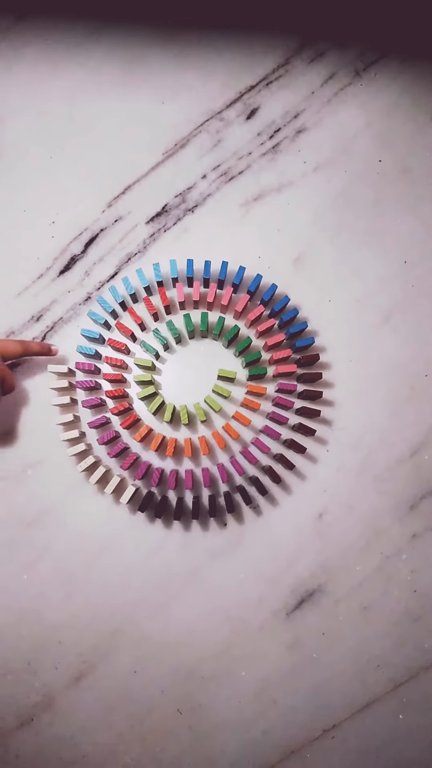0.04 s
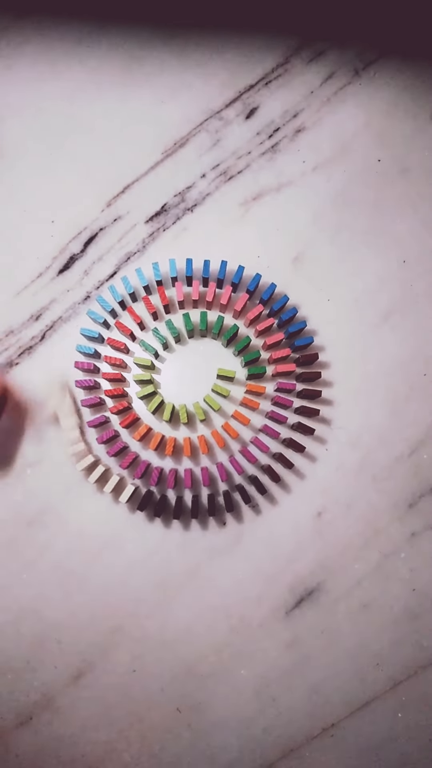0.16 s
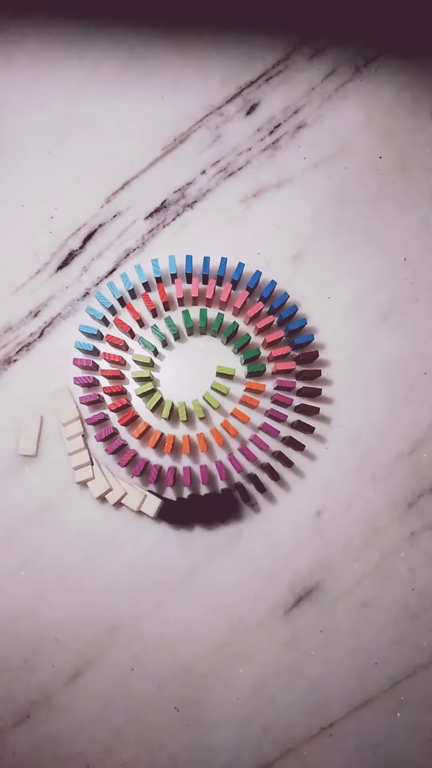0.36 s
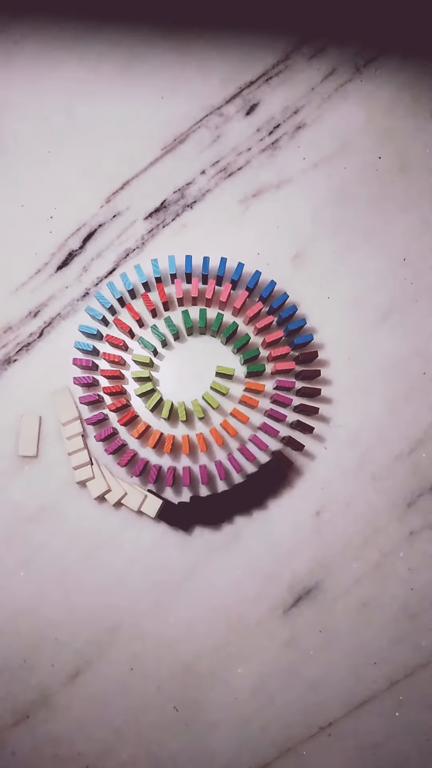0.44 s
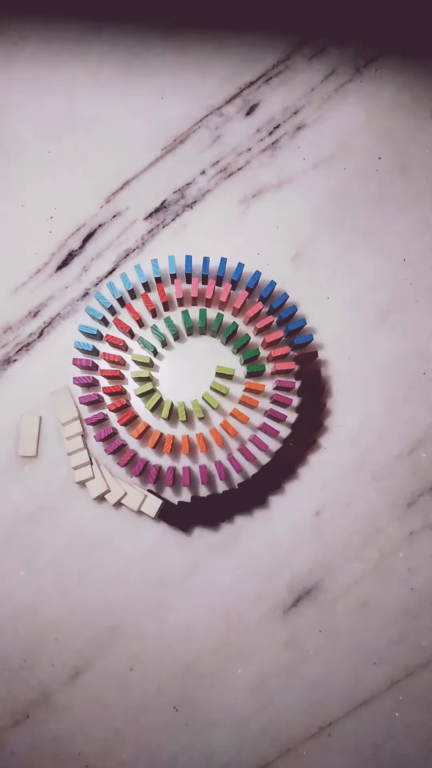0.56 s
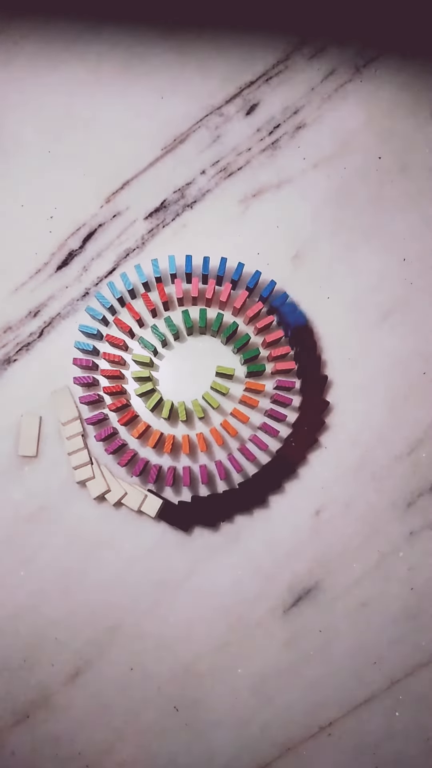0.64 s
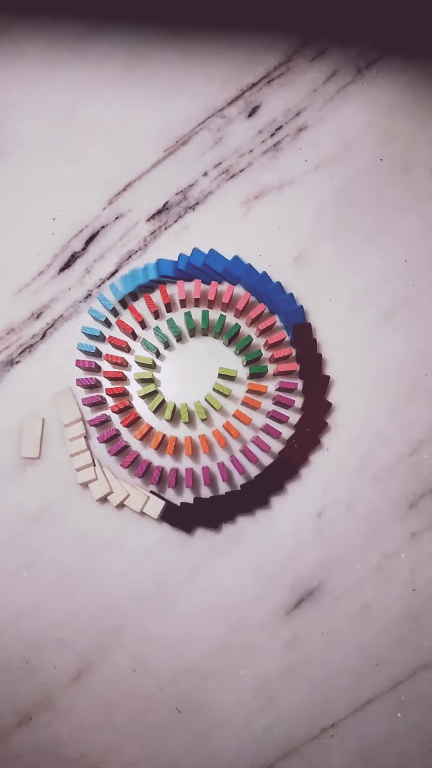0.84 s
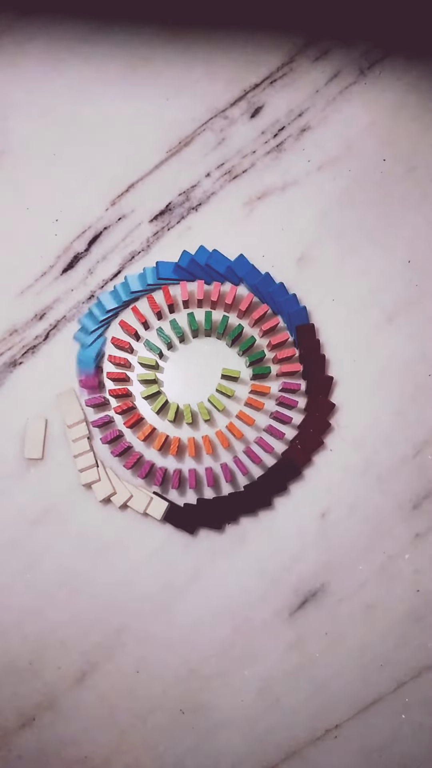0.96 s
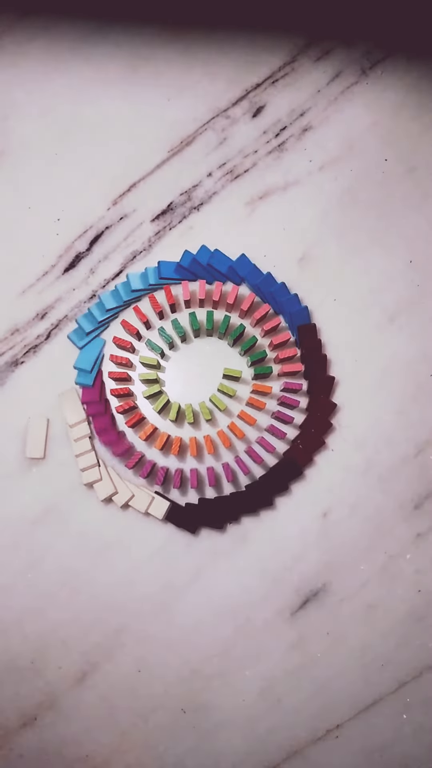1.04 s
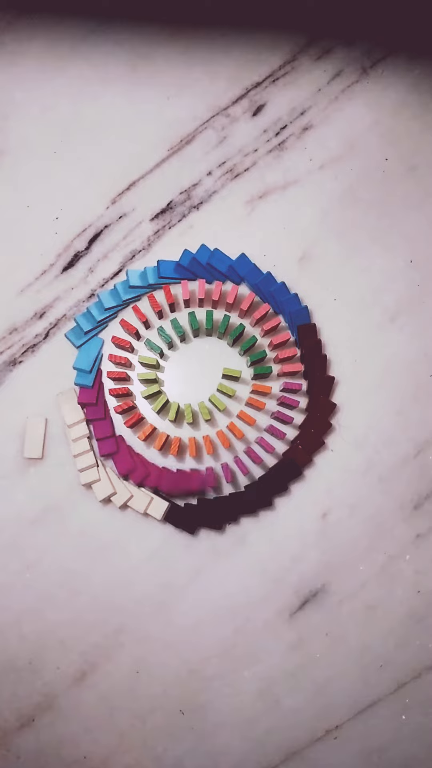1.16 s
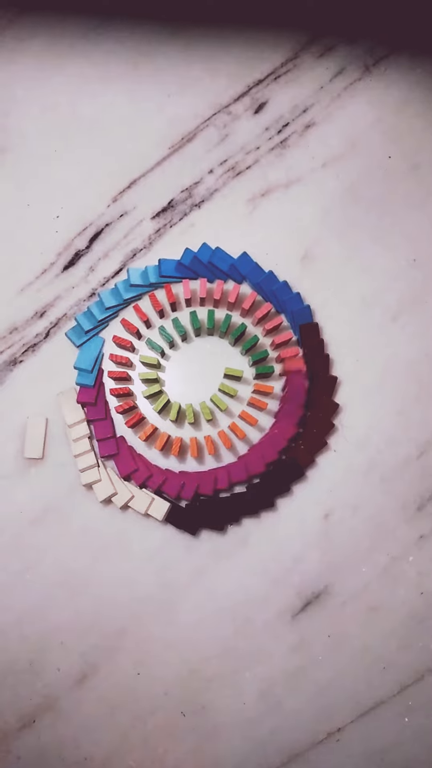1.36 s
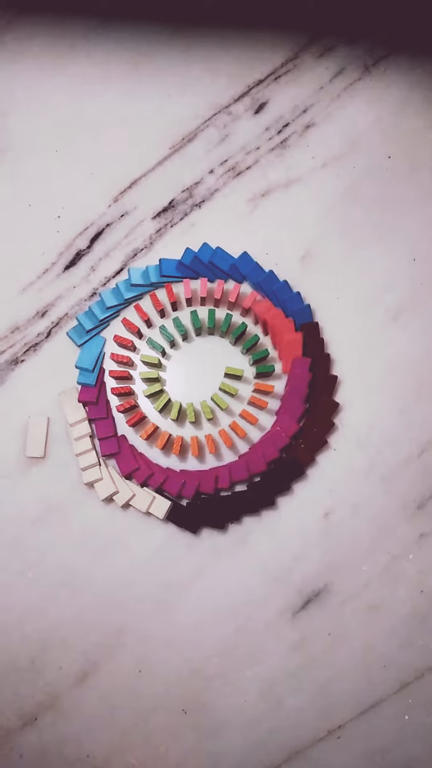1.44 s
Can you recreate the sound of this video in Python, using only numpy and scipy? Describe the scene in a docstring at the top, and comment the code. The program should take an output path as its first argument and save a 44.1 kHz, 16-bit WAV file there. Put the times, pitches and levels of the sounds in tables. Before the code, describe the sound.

Small wooden dominoes topple one after another on a marble floor, making a fast, bright clatter of sharp clicks that starts strong and then turns lighter. The microphone is close above, in a quiet, hard room.

```python
"""Dominoes toppling on marble

A spiral of small wooden dominoes falls on a marble floor, heard from a phone above it in a quiet, hard
room. Each knock is a bright crack with quick rebounds that rings the short modes of the block; lighter
contacts patter densely between the knocks. Soft thumps, low rumble, hiss and a faint whine lie behind."""
import sys
import numpy as np
from scipy import signal
from scipy.fft import rfft, irfft
from scipy.io import wavfile
from scipy.ndimage import uniform_filter1d

SR = 44100
rng = np.random.default_rng(int(sys.argv[2]) if len(sys.argv) > 2 else 0)


def digitize_waveform(pressure):
    """Quantize a signal to 16-bit integers and store it at the path in sys.argv[1].

    Rows of a 2-D input are taken as channels; values are limited to [-1, 1].
    """
    field = np.atleast_2d(pressure).T
    bounded = np.clip(field, -1, 1)
    quanta = np.round(bounded * 32767).astype(np.int16)
    wavfile.write(sys.argv[1], SR, quanta)


N = 66150  # 1.5 s


def knocks(hits=4, gap_s=0.0013):
    """Block strikes block: one hit, then quick rebounds, each slightly off pitch."""
    # knocks (time [s], level [dB], body ring [Hz], upper ring [dB re level], crack [dB re level])
    strikes = [(0.16, -41, 7600, -21, 4), (0.1689, -12, 8350, -26, 2), (0.1796, -20.5, 8800, -24, 12.5),
               (0.1898, -10, 8040, -19, 0.5), (0.1974, -30, 8850, -3, 2), (0.2148, -15, 8360, -3.5, 8.5),
               (0.2254, -36, 8100, -19, 14.5), (0.2291, -15.5, 8200, 3.5, 6.5), (0.236, -19.5, 8500, -3, 6),
               (0.2509, -22, 8400, 6, 11.5), (0.2755, -18, 8750, 1, 10), (0.2825, -12.5, 7800, -21, 9),
               (0.2947, 1.5, 8704, -16.5, -4.5), (0.3028, -22, 8140, -9, 13), (0.3116, -18, 9100, -6, 4.5),
               (0.3132, -23.5, 8160, 4, 6), (0.322, -13.5, 7930, -23, 11), (0.3322, -19, 9900, -22, -2),
               (0.3597, -14.5, 8040, -20, 8), (0.3725, -16.5, 6700, -3, -0.5), (0.393, -7, 7220, -5, 8.5),
               (0.4278, -10.5, 7500, -6, 7), (0.445, -18.5, 9400, 7, 0), (0.453, -2.5, 8110, -23, -10),
               (0.4647, -14.5, 9300, -13, -5), (0.4762, -10.5, 8140, -24, -14), (0.491, -6, 8190, -22, -28),
               (0.5137, -30.5, 8250, -6, 16), (0.5324, -43, 8200, -6, -12), (0.557, -30, 8700, -10, 0),
               (0.576, -26.5, 8860, 5, 13), (0.644, -28.5, 8760, -3, 11), (0.6716, -25.5, 8370, -6, 5.5),
               (0.7119, -14.5, 8720, -34, 2), (0.7337, -26, 8100, -21, 5), (0.773, -17.5, 8330, -17, -11),
               (0.7879, -22, 8760, -23, 3.5), (0.8433, -15.5, 7700, -12, -1),
               (0.8632, -20, 7600, -1.5, 5.5), (0.882, -12, 9030, -11, 0), (0.898, -27, 8700, -16, 5),
               (0.9052, -20, 9230, -6, -4), (0.934, -35, 8200, -10, 7.5), (0.976, -28, 6800, -12, 5),
               (0.9999, -27.5, 8660, -7, 9.5), (1.0229, -35, 9700, -9, 18), (1.0777, -29.5, 8230, 7, 14.5),
               (1.0992, -28, 9100, 4, 6), (1.122, -33, 6950, 8, 11), (1.1338, -25, 8640, -6, 4),
               (1.153, -31, 6800, 0.5, 12), (1.1985, -24.5, 8590, -20, -1.5),
               (1.2129, -20.5, 8190, -12, -0.5), (1.2219, -24, 8730, -10, 4.5),
               (1.23, -13.5, 8870, -30, -4.5), (1.2357, -21.5, 9370, -9, 4.5), (1.258, -23, 9030, -8, 8.5),
               (1.3249, -32, 8930, -16, -7), (1.346, -27, 8460, -29, 2), (1.3575, -33, 7540, -22, 12),
               (1.384, -31, 9590, -30, 8), (1.399, -40, 8200, -18, 14.5), (1.4336, -21.5, 8570, -25, 0.5),
               (1.4426, -17, 8560, -11, 1), (1.464, -24.5, 8260, -7, 8), (1.4781, -26.5, 8270, -7, 6),
               (1.495, -29, 8450, -12, -3)]
    at, db, body_hz, upper_db, crack_db = np.repeat(np.array(strikes, float), hits, axis=0).T
    timing, loss, detune = rng.random((len(at), 3)).T
    bounce = np.arange(len(at)) % hits
    rebound = bounce > 0
    at = at + gap_s * bounce * (0.9 + 0.25 * timing)
    rebound_db = np.minimum(-10.5 - 0.2358 * db, 3) - 4 * loss  # light knocks rebound more, and blur
    db = db + rebound * rebound_db
    body_hz = body_hz * (1 + 0.074 * rebound * (detune - 0.5))
    crack_db = crack_db + 2 * (bounce == 1)  # the first rebound cracks harder than the later ones
    return contacts(at, db, body_hz, upper_db, crack_db, bass_cut=0.85)


def patter(start_s=0.157, per_second=1600):
    """Dense light contacts between the knocks, pitched by the run of blocks that is falling."""
    # course of the patter (time [s], level [dB], crack [dB re level])
    course = [(0.158, -53, 19.5), (0.2, -35, 9), (0.33, -41, 9.5), (0.49, -40, 8.5), (0.6, -43, 7.5),
              (0.74, -40, 1), (0.88, -34.5, -1), (0.97, -45.5, 7), (1.12, -40.5, 9), (1.19, -53, 9),
              (1.26, -48.5, 6.5), (1.426, -54, 4.5), (1.446, -47, 4.5), (1.5, -40, 4.5)]
    times, levels, cracks = np.array(course, float).T
    span_s = N / SR - start_s
    at = start_s + span_s * rng.random(int(per_second * span_s))
    detune, crack_scatter, upper_scatter, level_scatter = rng.standard_normal((len(at), 4)).T
    _, body_hz, _, upper_db, _, _ = falling_run(at)
    db = np.interp(at, times, levels) + 4.5 * np.clip(level_scatter, -2, 2)
    crack_db = np.interp(at, times, cracks) + 4 * crack_scatter
    body_hz = body_hz * (1 + 0.0765 * detune)
    return contacts(at, db, body_hz, upper_db + 4 * upper_scatter, crack_db, bass_cut=0.0047)


def falling_run(at):
    """The ring settings of the run of alike blocks falling at each moment, column by column."""
    # runs (start [s], body ring [Hz], upper ring [Hz], upper ring in the patter [dB re body],
    #       top ring [Hz], top ring [dB re crack])
    runs = [(0.15, 8540, 13100, -16.5, 14700, -23), (0.225, 8530, 11360, -23, 15100, -25.5),
            (0.431, 8500, 10820, -16, 15600, -25), (0.55, 8500, 11350, -6, 15700, -26),
            (0.63, 8570, 11120, -14, 15400, -22), (0.721, 8170, 9770, -22, 15000, -20),
            (0.85, 8230, 12400, -12, 15400, -20), (0.99, 8430, 10130, -2, 14350, -19),
            (1.102, 8560, 10240, -13, 13050, -17), (1.19, 8880, 13200, -12, 15500, -24),
            (1.31, 8780, 13100, -28, 15500, -24), (1.43, 8200, 12930, -14, 15100, -19)]
    runs = np.array(runs, float)
    return runs[np.clip(np.searchsorted(runs[:, 0], at) - 1, 0, None)].T


def contacts(at, db, body_hz, upper_db, crack_db, bass_cut):
    """Each contact cracks and rings the block: three high modes and a faint hollow note of the wood."""
    noise = rng.standard_normal((len(at), 258))  # per contact: two detunings, then the crack's grain
    _, _, upper_hz, _, top_hz, top_db = falling_run(at)
    crack_level = db + crack_db
    crack = cracks(at, crack_level, noise[:, 2:], bass_cut)
    body = rings(at, body_hz, db, t60_s=0.0088)
    upper = rings(at, upper_hz * (1 + 0.014 * noise[:, 0]), db + upper_db, t60_s=0.0095)
    top = rings(at, top_hz * (1 + 0.028 * noise[:, 1]), crack_level + top_db, t60_s=0.0095)
    hollow = rings(at, 1124.5 * np.exp(0.1536 * noise[:, 1]), crack_level - 47, t60_s=0.028)
    return crack + body + upper + top + hollow


def cracks(at, db, noise, bass_cut, t60_s=0.0044, attack_s=0.0012, full_snap_db=-8):
    """The impact itself, a brief burst of noise: hard ones open with a snap, light ones swell in."""
    # spectrum of a crack (frequency [Hz], level [dB])
    spectrum = [(290, -56), (500, -67.5), (1200, -33.5), (1730, -19), (2090, -20), (5190, -13), (8250, -7),
                (10100, -19.5), (13200, -27.5), (15800, -37)]
    t = np.arange(noise.shape[1]) / SR
    hardness = undb(np.minimum(db - full_snap_db, 0) / 2)
    swell = 1 - (1 - hardness[:, None]) * np.exp(-t / attack_s)
    grain = noise * decay(t, t60_s) * swell
    grain[:, 0] = 5.3 * hardness ** 2 * np.sign(grain[:, 0])  # the snap
    grain /= np.sqrt(np.sum(grain ** 2, axis=1, keepdims=True))
    bursts = place(at, undb(db)[:, None] * grain)
    return signal.lfilter([1, -bass_cut], [1], colour(bursts, spectrum))


def rings(at, hz, db, t60_s, attack_s=0.0012):
    """One mode of the block: a fading sine from each contact."""
    t = np.arange(1200) / SR
    envelope = 2 * decay(t, t60_s) * (1 - np.exp(-t / attack_s))
    return place(at, undb(db)[:, None] * envelope * np.sin(2 * np.pi * hz[:, None] * t))


def reverb(direct, t60_s=0.37, build_s=0.0011):
    """The hard room answers with a short, diffuse tail."""
    t = np.arange(SR // 3) / SR
    tail = rng.standard_normal(len(t)) * decay(t, t60_s) * (1 - np.exp(-t / build_s))
    return signal.fftconvolve(direct, tail / np.sqrt(np.sum(tail ** 2)))[:N]


def thumps(half_length_s=0.014):
    """Soft, dull thumps, deep or hollow: each a brief swell of a tone and its octave."""
    # thumps (centre time [s], level [dB], pitch [Hz])
    swells = [(0.04, -51.5, 80), (.112, -56, 92), (.35, -52.5, 65), (.44, -48, 72), (.545, -50.5, 75),
              (0.669, -53, 80), (0.724, -48.5, 95), (.875, -54.5, 62), (0.976, -51, 80), (0.216, -49, 920),
              (.32, -62.5, 308), (.39, -62, 480), (.44, -64, 300), (.872, -64, 311.5)]
    t = np.arange(N) / SR
    out = np.zeros(N)
    for at, db, hz in swells:
        phase = 2 * np.pi * rng.random(2)
        tone = np.sin(2 * np.pi * hz * t + phase[0]) + 0.39 * np.sin(4 * np.pi * hz * t + phase[1])
        out += undb(db) * np.exp(-((t - at) / half_length_s) ** 2) * tone
    return out


def room_tone(whine_fade_db_per_s=8.5):
    """The quiet room: soft hiss, low rumble and a whine of narrow tones that waver and fade."""
    # spectrum of the hiss (frequency [Hz], level [dB])
    spectrum = [(76, -47), (130, -7), (309, -7.5), (481, -10), (2050, -20.5), (2220, -14.5), (3200, -7.5),
                (4680, -30), (9100, -26.5), (16000, -51)]
    # tones of the whine (frequency [Hz], width [Hz], level before wavering and fading [dB])
    whine = [(2260, 49, -74.5), (2846, 26, -66), (3144, 62, -63.5), (309.3, 22, -72)]
    t = np.arange(N) / SR
    f = np.maximum(np.arange(N // 2 + 1) * SR / N, 1)
    hiss = shaped_noise(undb(spectrum_db(f, spectrum)))
    rumble = noise_band(f, hz=95, width_hz=40)
    out = undb(-65) * hiss + undb(-67) * rumble
    for hz, width_hz, db in whine:
        waver_db = 3.1 * wander(rate_hz=11.52)
        out += undb(db - whine_fade_db_per_s * t + waver_db) * noise_band(f, hz, width_hz)
    return out


def noise_band(f, hz, width_hz):
    """A bell-shaped band of noise on the frequency grid f."""
    return shaped_noise(np.exp(-((f - hz) / width_hz) ** 2))


def shaped_noise(gains):
    """Noise with the given spectrum, at rms 1."""
    x = irfft(rfft(rng.standard_normal(N)) * gains, N)
    return x / np.sqrt(np.mean(x ** 2))


def wander(rate_hz):
    """Smooth random drift, spread near 1."""
    hold = int(SR / rate_hz)
    steps = np.repeat(rng.standard_normal(N // hold + 1), hold)
    return np.sqrt(2) * uniform_filter1d(uniform_filter1d(steps, hold), hold)[:N]


def colour(x, spectrum):
    """Minimum-phase filter through (Hz, dB) points; its impulse response peaks at 1."""
    f = np.maximum(np.arange(1025) * SR / 2048, 1)
    cepstrum = irfft(spectrum_db(f, spectrum) * np.log(10) / 20)
    cepstrum[1:1024] *= 2
    cepstrum[1025:] = 0
    impulse = irfft(np.exp(rfft(cepstrum)))
    return signal.fftconvolve(x, impulse / np.abs(impulse).max())[:N]


def spectrum_db(f, points):
    """Join (Hz, dB) points over log frequency."""
    hz, db = np.array(points, float).T
    return np.interp(np.log(f), np.log(hz), db)


def place(at, waves):
    """Sum short waves at their moments."""
    where = (at * SR).astype(int)[:, None] + np.arange(waves.shape[1])
    return np.bincount(where.ravel(), waves.ravel(), N + SR)[:N]


def decay(t, t60_s):
    """A fade of 60 dB in t60_s."""
    return np.exp(-np.log(1000) * t / t60_s)


def undb(db):
    """dB to gain."""
    return 10 ** (np.asarray(db) / 20)


def scene():
    """The dominoes, the room's answer and the background at the microphone, in mono."""
    dominoes = knocks() + patter()
    return (dominoes + undb(-5.5) * reverb(dominoes) + room_tone() + thumps())[None]


def record(dry, ceiling=1.15, roll_off_hz=15760, cut_hz=16700):
    """The loudest cracks are gently rounded, then the top of the treble is rolled off and cut."""
    rounded = dry / (1 + (dry / ceiling) ** 4) ** 0.25
    rolled = signal.sosfilt(signal.ellip(6, 0.5, 28, roll_off_hz, fs=SR, output="sos"), rounded)
    return signal.sosfilt(signal.ellip(10, 0.2, 80, cut_hz, fs=SR, output="sos"), rolled)


dry = scene()
out = record(dry)
digitize_waveform(out)
```